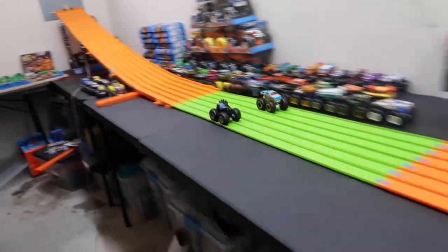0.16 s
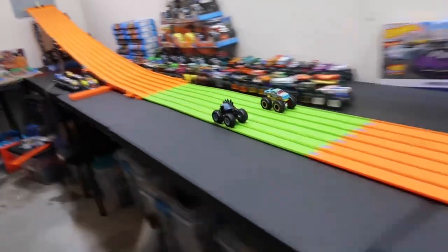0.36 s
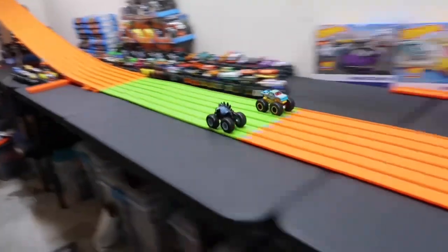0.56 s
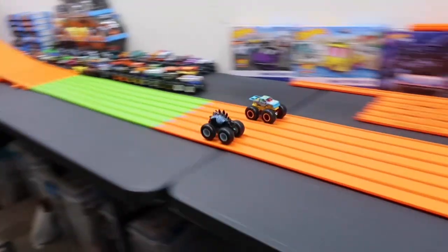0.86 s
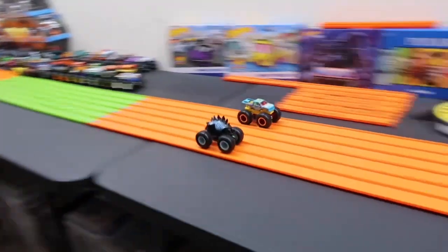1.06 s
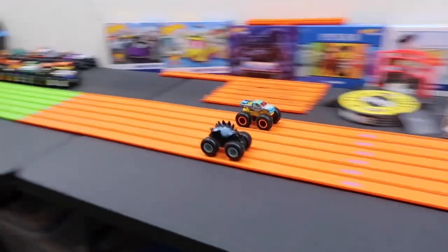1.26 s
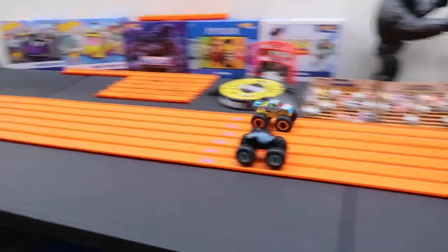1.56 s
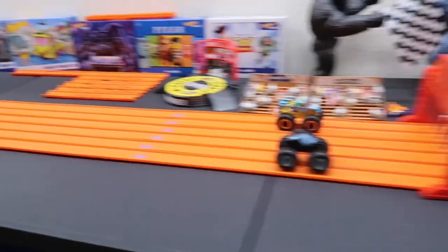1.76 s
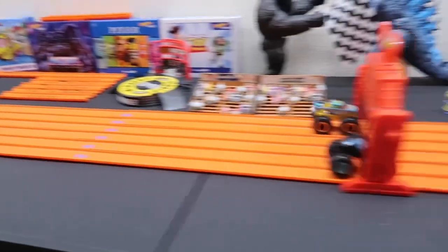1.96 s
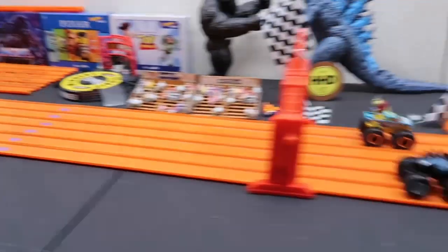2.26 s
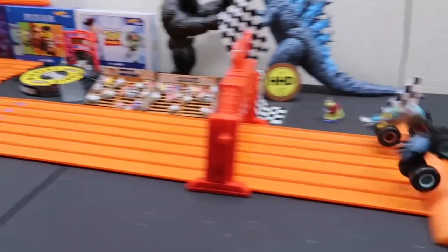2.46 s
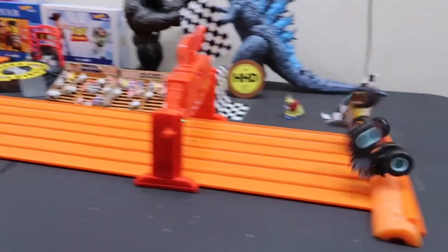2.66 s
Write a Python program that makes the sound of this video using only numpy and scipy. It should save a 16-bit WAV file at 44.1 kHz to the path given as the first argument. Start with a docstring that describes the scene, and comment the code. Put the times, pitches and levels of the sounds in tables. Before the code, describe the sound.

Toy truck wheels roll on a plastic track from the start, a loud, grainy, hollow rumble with low table boom, dull knocks and small bumps near 0.45 and 1.05 seconds. Around 2.0 to 2.15 sharp plastic clacks rattle rapidly. At 2.35 to 2.5 the trucks thud and clatter into the end stop; rolling fades to faint low hum, with a final knock near 2.8. Small room, close microphone, dull treble.

```python
"""Toy truck race

Two toy trucks race down a plastic track laid over tables in a small room, the microphone moving with them.
Treads patter (random contacts through filters and track modes); the tables boom and drone below.
The trucks clatter through the finish gate (noise cracks and rattles ring plastic modes),
thud into the end stop and tumble (pulses ring low modes); one drops back with a knock.
Delay loops add the room; a faint low hum lingers."""
import sys
import numpy as np
from scipy import signal
from scipy.fft import rfft, irfft, next_fast_len
from scipy.io import wavfile
from scipy.ndimage import uniform_filter1d

SR = 44100
rng = np.random.default_rng(int(sys.argv[2]) if len(sys.argv) > 2 else 0)


def bounce(signal):
    """Save signal as a 16-bit WAV file at the path given by the first command-line argument."""
    frames = np.transpose(np.atleast_2d(signal))
    limited = np.clip(frames, -1, 1)
    pcm = np.round(limited * 32767).astype(np.int16)
    wavfile.write(sys.argv[1], SR, pcm)


N = 123479
T = np.arange(N) / SR
FFT_SIZE = next_fast_len(N + SR, True) // 2 * 2
FFT_HZ = np.arange(FFT_SIZE // 2 + 1) * SR / FFT_SIZE

# Low tones lingering after the stop: f/Hz, level/dB rms
HUM_TONES = [(177.6,-31.5),(334,-34.5)]

# Spectral shape of the table boom: f/Hz, relative gain/dB
BOOM_COLOUR = [(20,-34),(43,-12.5),(56,11.5),(72,1.5),(100,-9),(400,-64.5)]
# Table drones as the trucks cross: t of top/s, f/Hz, level at top/dB rms, half width/s
TABLE_DRONES = [(.475,222.2,-21,.032),(0.575,210,-24,0.05),(.69,197,-20,0.013),(1.085,124,-20,0.023),(1.26,175.9,-21,0.082),(1.525,119,-15.5,0.06),(1.93,245,-19,0.03),(1.99,165,-20,0.035)]
# Thuds against the end stop, the last the low thump of the truck dropping back: t/s, pulse level before band-
# pass/dB
THUDS = [(2.354,-10.5),(2.411,-11),(2.460,-16),(2.787,-12.5)]
# Table modes rung by the thuds: f/Hz, gain/dB, t60/s
TABLE_MODES = [(58,-0.5,0.2),(68.3,0.5,0.18),(103.1,-8,0.76)]
BOOM_DB, THUD_LOW_HZ, THUD_HIGH_HZ = -31, 40, 160

# Rattling spells (bumps, gate, crash, tumble): t/s, level before colour/dB, decay time constant/s
RATTLES = [(0.439,-28,0.065),(1.04,-24,0.036),(1.994,-19,0.043),(2.04,-21,0.11),(2.344,-22.5,0.04),(2.401,-26.5,0.27),(2.726,-25,0.12)]
# Sharp clacks on gate and end stop: t/s, level before colour/dB
CLACKS = [(1.9945,-8),(1.999,-6.5),(2.0187,-3.5),(2.039,-9),(2.059,-5.5),(2.078,-7.5),(2.101,-12),(2.126,-6.5),(2.377,-17.5),(2.409,-11),(2.428,-12.5),(2.4438,-14.5),(2.4991,-9)]
# Filter for rattles and clacks: f/Hz, gain/dB
CLACK_COLOUR = [(100,12.5),(400,12),(900,-8.5),(1700,4.5),(2600,0),(3500,-4),(4600,-9.5),(6000,-12),(7700,-31)]
# Ringing of the hard plastic: f/Hz, gain/dB, t60/s
PLASTIC_MODES = [(1700,-43.5,0.11),(2110,-45,0.062),(3197,-48,0.034),(3710,-57.5,0.055),(5900,-61,0.12)]
RATTLE_ATTACK_S, RATTLE_TICKS_PER_S, CLACK_DECAY_S = 0.0038, 1000, 0.0025
COLLISION_S, COLLISION_DB, SHELL_HZ, SHELL_T60_S = 2.4995, -19.5, 3530, 0.026

# Passing swells of narrow-band rolling noise (track ringing; high axle rattle near 5 kHz):
# t of top/s, f/Hz, level at top/dB rms, half width/s
ROLLING_SWELLS = [(.18,5130,-45,.025),(.23,1320,-27,0.042),(.475,1285,-24.5,.045),(.785,1490,-27,0.055),(.86,5000,-45.5,0.035),(1.0,920,-20,0.045),(1.07,1122,-21,.035),(1.65,925,-24.5,.06),(1.87,935,-21.5,0.062),(2.07,610,-20.5,0.046),(2.29,581,-23.5,0.12)]
SWELL_BAND_OCTAVES = 0.43

# Spectral shape of tread contacts, bright part: f/Hz, relative gain/dB
TREAD_COLOUR = [(150,-18),(330,-7.5),(480,4),(900,2.5),(1220,-6),(1600,-8),(2100,-14.5),(3000,-20.5),(4000,-33),(5500,-41),(7500,-56)]
# Spectral shape of tread contacts, low part: f/Hz, relative gain/dB
RUMBLE_COLOUR = [(60,-31.5),(100,-2.5),(150,-3),(240,-1.5),(320,-2.5),(430,-12.5),(700,-38.5),(2000,-81)]
# Spectral shape of loose-axle ticks: f/Hz, relative gain/dB
AXLE_COLOUR = [(800,-11.5),(2000,14),(3500,5),(5800,-2.5),(6600,-9.5),(7700,-46.5)]
# Hollow ringing of the track, before pitch drift: f/Hz, gain/dB, t60/s
TRACK_MODES = [(326,-42,0.054),(904,-43,0.011),(1200,-41,0.018)]
# Dull wheel knocks on the track: t/s, pulse level before colour/dB
WHEEL_KNOCKS = [(.498,9),(.743,8),(.787,11),(1.083,8),(1.644,13.5),(1.762,5),(1.862,9.5),(1.892,6),(2.7868,15.5)]
# Filter for the wheel knocks: f/Hz, gain/dB
KNOCK_COLOUR = [(60,-25),(300,13),(600,3),(900,13.5),(1300,4),(2000,-11.5),(3200,-16.5),(6000,-50)]
# Swells and dips of the rolling level:
# t of middle/s, change of tread/dB, change of rumble/dB, change of boom/dB, half width/s
ROLLING_LEVELS = [(.22,2,-1.5,-7,0.084),(.37,2,1.5,10.5,0.056),(0.473,4,4.5,1.5,0.042),(.565,1.5,6.5,12,0.022),(.76,1,2.5,8,0.05),(1.072,3,6,2,0.025),(1.24,1,2.5,8.5,0.19),(1.56,0.5,2.5,6.5,0.12),(2.07,2.5,1,8,0.083),(2.3,0.5,3.5,3,0.096)]
TOUCHES_PER_S, TOUCH_SPREAD_DB = 2200, 2
TREAD_DB, RUMBLE_DB = -21.5, -21
AXLE_DB, AXLE_TICKS_PER_S, AXLE_FOLLOWS = -41.5, 1500, 0.56  # share of the treads' dB swing
STOP_S, STOP_FALL_S = 2.39, 0.096
STOP_LOSS_DB = [6.5, 7.5, 6]  # tread, rumble, boom

# Filter from room sound to stereo side: f/Hz, gain/dB
SIDE_COLOUR = [(60,-44),(600,-22.5),(1300,-17.5),(2500,-7.5),(4200,0.5),(6500,1)]
ROOM_T60_S, ROOM_DB = 0.21, -6.5
WANDER_SHARE, WANDER_PER_S = 0.03, 0.8  # resonance drift: peak share of pitch, cycles/s
LEFT_LAG_S, LEFT_GAIN_DB = 2 / SR, -0.48
CUTOFF_HZ = 7900


def from_db(db):
    """Decibels to amplitude gain."""
    return 10 ** (np.asarray(db) / 20)


def coloured(x, colour):
    """Causal minimum-phase filter, built by folding the real cepstrum."""
    hz, db = np.transpose(colour)
    gain = from_db(np.interp(np.log(FFT_HZ + 1), np.log(hz), db))
    cepstrum = irfft(np.log(gain))
    cepstrum[1:FFT_SIZE // 2] *= 2
    cepstrum[FFT_SIZE // 2 + 1:] = 0
    return irfft(rfft(x, FFT_SIZE) * np.exp(rfft(cepstrum)))[:N]


def evened(x, over_s):
    """Hold the slow level at rms 1; keep the fast grain."""
    size = max(int(over_s * SR), 2)
    power = uniform_filter1d(uniform_filter1d(x ** 2, size), size)
    return x / np.sqrt(np.abs(power) + 1e-12)


def patter(per_s, spread_db):
    """Random contacts of uneven strength and either sign."""
    strength_db = abs(spread_db) * np.clip(rng.standard_normal(N), -2, 2)
    contacts = from_db(strength_db) * rng.choice([-1, 1], N)
    return contacts * (rng.random(N) < per_s / SR)


def blows(rows):
    """One impulse per (t/s, level/dB) row."""
    t_s, db = np.transpose(rows)
    out = np.zeros(N)
    out[np.clip((t_s * SR).astype(int), 0, N - 1)] = from_db(db)
    return out


def ring(clicks, hz, t60_s):
    """Two-pole resonator: a unit click starts a decaying sine of height 1."""
    radius = from_db(-60 / (t60_s * SR))
    angle = 2 * np.pi * hz / SR
    return signal.lfilter([0, np.sin(angle)], [1, -2 * radius * np.cos(angle), radius ** 2], clicks + 1e-18)


def ring_modes(x, modes):
    """Sum of resonators driven by one signal."""
    return sum(from_db(db) * ring(x, hz, t60_s) for hz, db, t60_s in modes)


def swell(t_s, half_width_s):
    """Gaussian rise and fall around t_s."""
    return np.exp(-((T - t_s) / half_width_s) ** 2)


def wandering(resonator, x):
    """Run a resonator on a clock that gains and loses, so its pitches drift as the trucks travel."""
    turn = 2 * np.pi * WANDER_PER_S
    clock_s = T - WANDER_SHARE * (1 - np.cos(turn * T)) / turn
    return np.interp(clock_s, T, resonator(np.interp(T, clock_s, x)))


def stopped():
    """0 while the trucks roll, ramping to 1 as they come to rest."""
    return np.clip((T - STOP_S) / STOP_FALL_S, 0, 1)


def rolling_level_changes():
    """Swells and dips of tread, rumble and boom in dB, with the loss after the stop."""
    changes_db = sum(np.outer(db, swell(t_s, width_s)) for t_s, *db, width_s in ROLLING_LEVELS)
    return changes_db - np.outer(STOP_LOSS_DB, stopped())


def room(x):
    """Feedback delays between the walls, scaled to unit mean power gain."""
    response = 0
    for k, lag_s in enumerate(rng.uniform(0.004, 0.06, size=24)):
        delay = np.exp(-2j * np.pi * FFT_HZ * int(lag_s * SR) / SR)
        trip = from_db(-60 * lag_s / ROOM_T60_S) * delay
        response = response + (-1) ** k * np.sqrt(lag_s) * trip / (1 - trip)
    response = response / np.sqrt(np.mean(np.abs(response) ** 2))
    return irfft(rfft(x, FFT_SIZE) * response)[:N]


def hum():
    """Noise through narrow resonators: slightly wavering low tones once the rolling ends."""
    tones = 0
    for hz, db in HUM_TONES:
        tone = ring(rng.standard_normal(N), hz, t60_s=7.2)
        tones = tones + from_db(db) * evened(tone, over_s=0.11)
    return stopped() * tones


def tables():
    """Table tops boom (filtered noise), drone (swelling sines) and take soft thuds (rung modes)."""
    boom_noise = coloured(rng.standard_normal(N), BOOM_COLOUR)
    boom = from_db(BOOM_DB + rolling_level_changes()[2]) * evened(boom_noise, over_s=0.13)
    drones = 0
    for t_s, hz, db, width_s in TABLE_DRONES:
        sine = np.sqrt(2) * np.sin(2 * np.pi * hz * T)  # rms 1
        drones = drones + from_db(db) * swell(t_s, width_s) * sine
    band = signal.butter(1, [THUD_LOW_HZ, THUD_HIGH_HZ], "band", fs=SR, output="sos")
    pushes = signal.sosfilt(band, blows(THUDS))
    return boom + drones + ring_modes(pushes, TABLE_MODES)


def clatter():
    """Noise cracks and dying rattles ring the plastic of trucks and gate; the collision pings a shell."""
    spells = 0
    for t_s, db, decay_s in RATTLES:
        attack = np.clip((T - t_s) / RATTLE_ATTACK_S, 0, 1)
        decay = np.exp(-np.maximum(T - t_s, 0) / decay_s)
        spells = spells + from_db(db) * attack * decay
    rattle = spells * evened(patter(RATTLE_TICKS_PER_S, spread_db=2.5), over_s=0.02)
    crack_decay = np.exp(-1 / (CLACK_DECAY_S * SR))
    crack_envelope = signal.lfilter([1], [1, -crack_decay], blows(CLACKS) + 1e-18)
    hits = rattle + crack_envelope * rng.standard_normal(N)
    shell = ring(blows([(COLLISION_S, COLLISION_DB)]), SHELL_HZ, SHELL_T60_S)
    return coloured(hits, CLACK_COLOUR) + ring_modes(hits, PLASTIC_MODES) + shell


def rolling_swells():
    """Random contacts, band-passed, give passing swells of track ringing and high axle rattle."""
    out = 0
    half_band = 2 ** (SWELL_BAND_OCTAVES / 2)
    for t_s, hz, db, width_s in ROLLING_SWELLS:
        band = signal.butter(2, [hz / half_band, hz * half_band], "band", fs=SR, output="sos")
        noise = signal.sosfilt(band, patter(TOUCHES_PER_S, TOUCH_SPREAD_DB))
        out = out + from_db(db) * swell(t_s, width_s) * evened(noise, over_s=0.026)
    return out


def track(contacts, colour):
    """Each contact gives a short tap and sets the hollow track ringing."""
    hollow = wandering(lambda x: ring_modes(x, TRACK_MODES), contacts)
    return coloured(contacts, colour) + hollow


def wheels():
    """Tread contacts drive the track, bright and low; loose axles tick along and wheels knock."""
    tread_db, rumble_db, _ = rolling_level_changes()
    touches = patter(TOUCHES_PER_S, TOUCH_SPREAD_DB)
    tread = from_db(TREAD_DB + tread_db) * evened(track(touches, TREAD_COLOUR), over_s=0.1)
    rumble = from_db(RUMBLE_DB + rumble_db) * evened(coloured(touches, RUMBLE_COLOUR), over_s=0.034)
    ticks = coloured(patter(AXLE_TICKS_PER_S, spread_db=0.0), AXLE_COLOUR)
    axles = from_db(AXLE_DB + AXLE_FOLLOWS * tread_db) * evened(ticks, over_s=0.13)
    return tread + rumble + axles + track(blows(WHEEL_KNOCKS), KNOCK_COLOUR)


def scene():
    """Direct sound sits in the middle; the room spreads mostly treble; left is late and slightly softer."""
    trucks = wheels() + rolling_swells() + clatter()
    low = tables() + hum()
    wet = from_db(ROOM_DB)
    mid = (trucks + wet * wandering(room, trucks)) / np.sqrt(1 + wet ** 2) + low
    side = coloured(wandering(room, trucks + low), SIDE_COLOUR)
    left = from_db(LEFT_GAIN_DB) * np.interp(T - LEFT_LAG_S, T, mid + side)
    return np.array([left, mid - side])


def record(dry):
    """Steep elliptic low-pass cuts the top."""
    lowpass = signal.ellip(10, 0.3, 90, CUTOFF_HZ, fs=SR, output="sos")  # ripple/dB, stop-band loss/dB
    return signal.sosfilt(lowpass, dry)


dry = scene()
out = record(dry)
bounce(out)
```